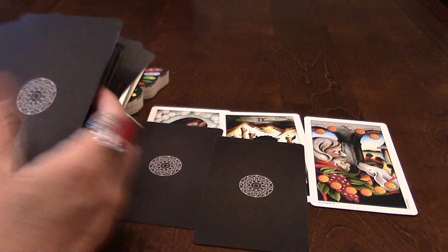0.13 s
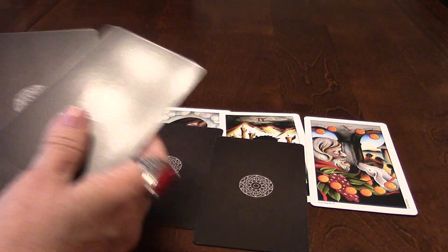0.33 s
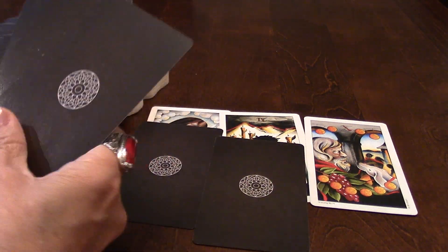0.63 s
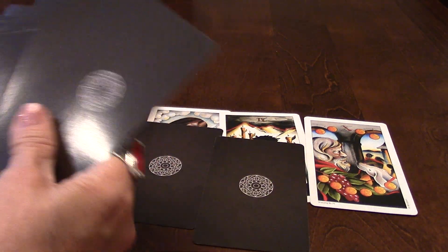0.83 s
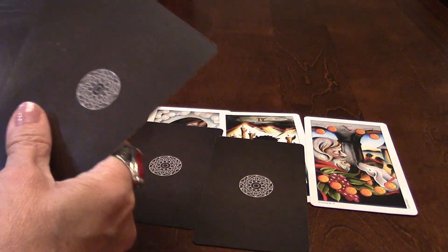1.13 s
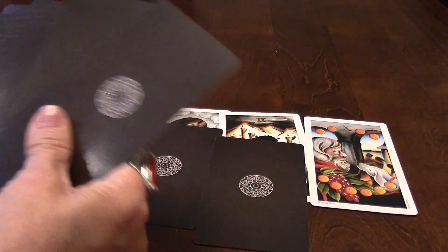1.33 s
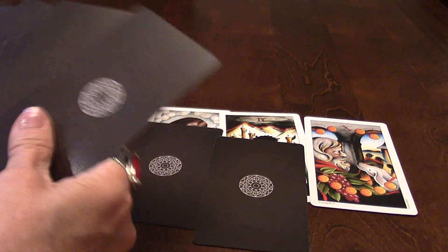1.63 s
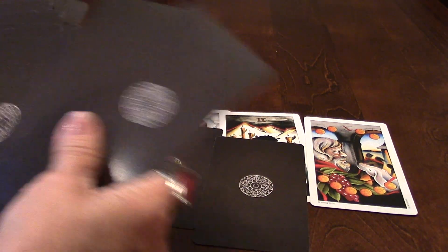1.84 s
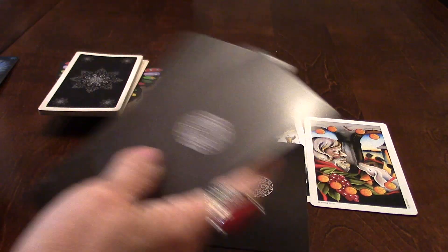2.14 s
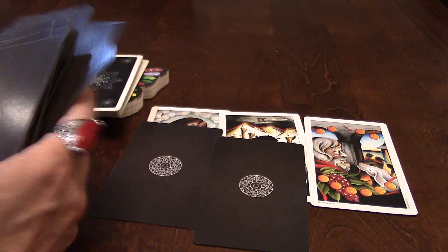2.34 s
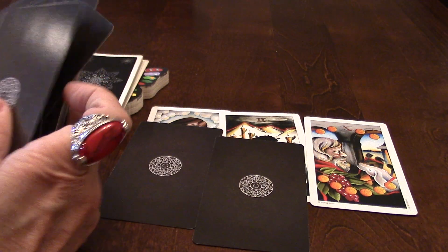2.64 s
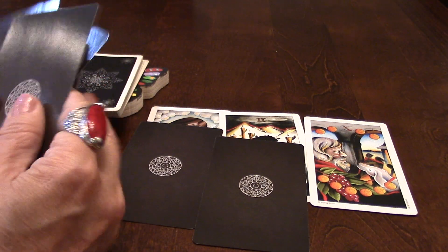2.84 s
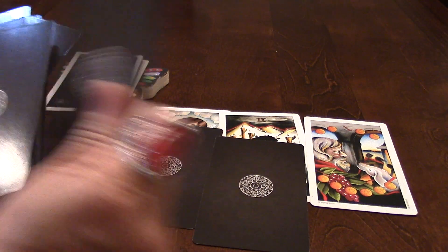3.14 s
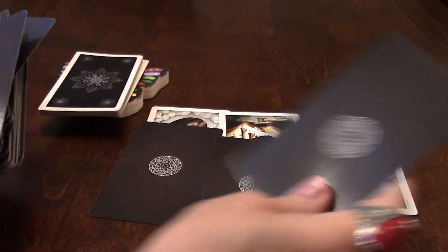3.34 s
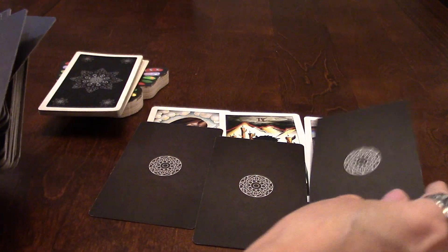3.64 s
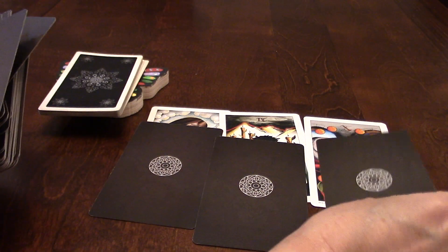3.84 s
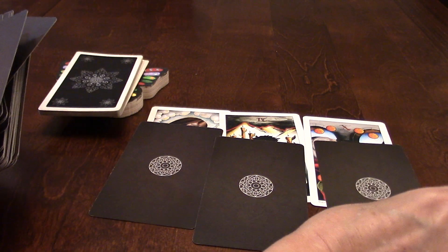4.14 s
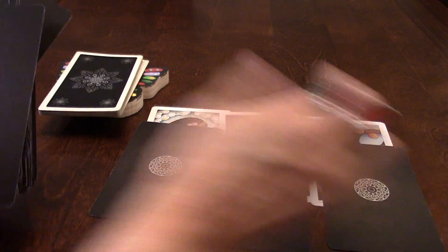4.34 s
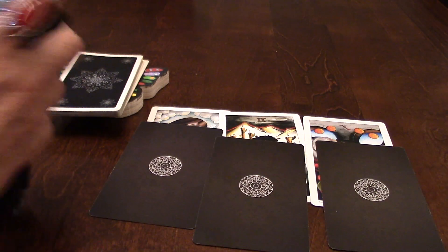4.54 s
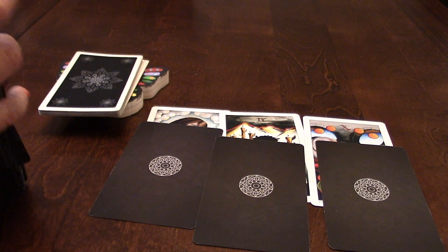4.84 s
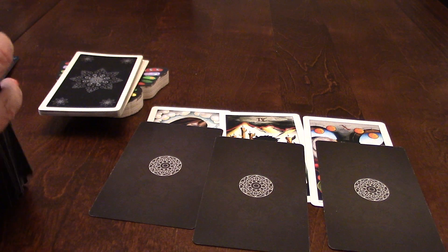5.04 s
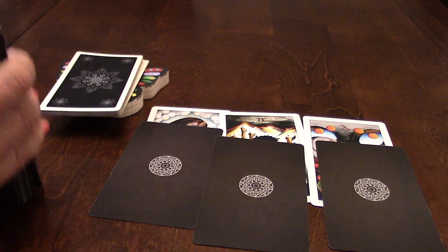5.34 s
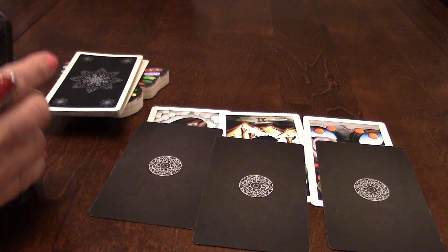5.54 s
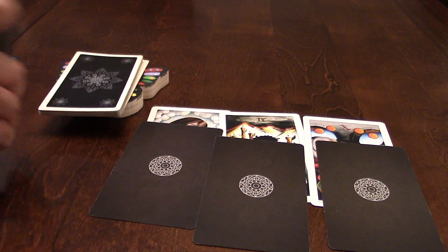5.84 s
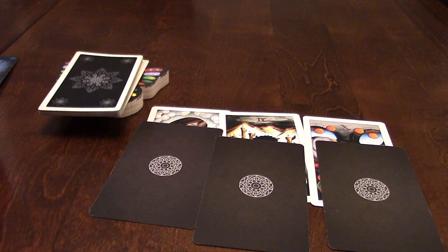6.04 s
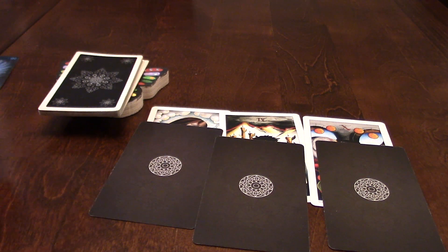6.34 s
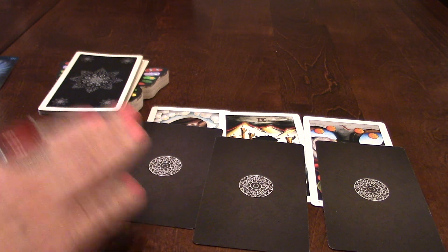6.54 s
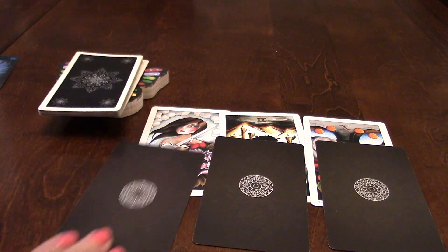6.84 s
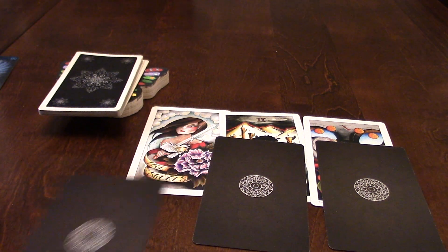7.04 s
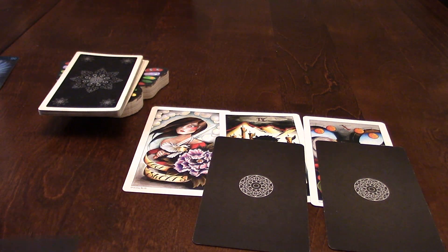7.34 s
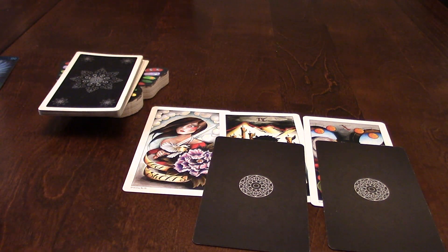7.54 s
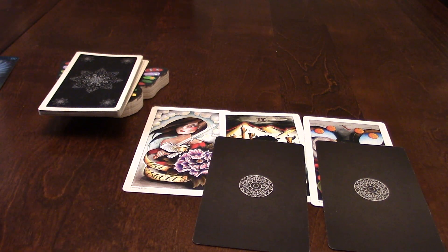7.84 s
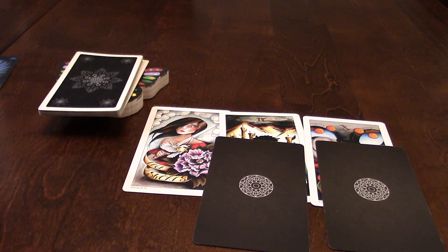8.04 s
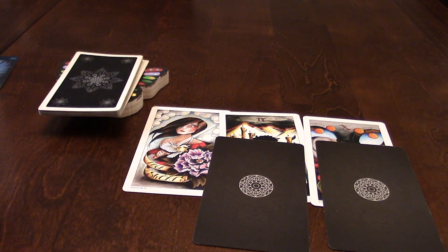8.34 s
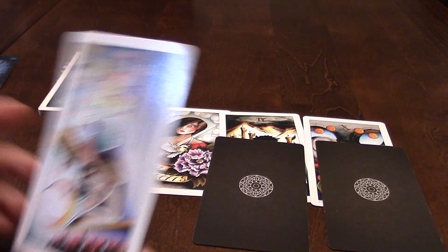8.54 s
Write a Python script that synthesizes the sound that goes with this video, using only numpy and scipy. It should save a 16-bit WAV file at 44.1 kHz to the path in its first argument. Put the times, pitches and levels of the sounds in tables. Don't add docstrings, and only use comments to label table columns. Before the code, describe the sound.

A small, bass-light camera microphone sits close to cards on a wooden table in a quiet room with a short, lively tail. A distant appliance hums faintly and unsteadily, while a tiny high focus-motor whine pulses about seven times a second at first, then in short bursts. From 0 to 1.9 s, stiff cards rub and flick softly with small snaps near 0.15 and 0.45. Sharp snaps cluster at 2.0 and 2.26-2.29, a lighter one at 2.6, then a swish and slap at 3.1-3.2. A very crisp slap lands at 4.1. The deck is knocked square at 4.6, 4.76 and 5.08, clacking woodily and shuffling as it settles. Light ticks and rubbing follow at 5.35-5.6. A heavy thump hits at 6.2, a softer one at 6.7. Thin airy sliding and faint ticks remain until 8.7, with two barely audible, very high motor tones between 7.1 and 8.

```python
import sys
import numpy as np
from scipy import signal
from scipy.io import wavfile
from scipy.ndimage import uniform_filter1d

SR = 44100
rng = np.random.default_rng(int(sys.argv[2]) if len(sys.argv) > 2 else 0)


def boost(x):
    u = np.asarray(x, float) / 20
    return 10 ** u


def unload_audio(sound):
    columns = np.transpose(np.atleast_2d(sound))
    steps = np.round(np.clip(columns, -1, 1) * 32767)
    wavfile.write(sys.argv[1], SR, steps.astype(np.int16))


N = 383229
TIME = np.arange(N) / SR


def rms_one(x):
    return x / np.sqrt(np.mean(x ** 2) + 1e-20)


def peak_one(x):
    return x / np.max(np.abs(x))


def band(x, low_hz, high_hz):
    sos = signal.butter(2, [low_hz, min(high_hz, .45 * SR)], "band", fs=SR, output="sos")
    return signal.sosfilt(sos, x)


def at_hz(points, hz, axis=1):
    table = np.array(points)
    return np.interp(np.log(hz), np.log(table[:, 0]), table[:, axis])


def drift(rate):
    r = np.exp(-80 * np.pi * rate / SR)
    noise = rng.standard_normal(N // 40 + 2002)
    slow = signal.lfilter([1], [1, -2 * r, r * r], noise)[2000:]
    return np.interp(np.arange(N) / 40, np.arange(len(slow)), rms_one(slow))


def resonate(x, peaks):
    out = 0
    for k, (hz, width_hz, level_db) in enumerate(peaks):
        r = np.exp(-np.pi * width_hz / SR)
        a = [1, -2 * r * np.cos(2 * np.pi * hz / SR), r * r]
        out = out + (-1) ** k * boost(level_db) * signal.lfilter([(1 - r * r) / 2, 0, (r * r - 1) / 2], a, x)
    return out


def ring(x, modes, longest_s):
    out = 0
    for hz, level_db, t60 in modes:
        r = boost(-60 / (min(t60, longest_s) * SR))
        w = 2 * np.pi * hz / SR
        out = out + boost(level_db) * signal.lfilter([0, np.sin(w)], [1, -2 * r * np.cos(w), r * r], x)
    return out


def contact(noise, ms):
    t = np.arange(len(noise)) / SR
    return noise * np.minimum(t / 0.0011, 1) * np.exp(-t / (max(ms, .3) / 2000))


def stick_slip_grains():
    slips = rng.random(N) < 12000 * boost(3.0 * drift(40)) / SR
    size = boost(1.1 * np.minimum(rng.exponential(1, N), 4))
    return slips * size * np.sign(rng.random(N) - .5)


def add(track, s, sound):
    i = round(s * SR)
    track[i:i + len(sound)] += sound[:N - i]


# (frequency [Hz], level [dB per Hz])
AIR = [(15, -57), (25, -15.5), (80, -19), (263, -5), (363, -5.5), (416, -4.5), (489, -10), (575, -6.5),
       (1190, -20.5), (4610, -30.5), (5730, -31), (7310, -39.5), (11300, -43.5), (14800, -49), (16000, -34)]
# (frequency [Hz], left-right likeness [0-1])
LIKENESS = [(60, 0.17), (180, 0.76), (550, 0.88), (1650, 0.5), (4970, 0.86), (15000, 0.58)]
AIR_DB = -49.5


def room_air():
    out = 0
    edges = 25 * 2 ** np.arange(0, 9.6, .5)
    white = rng.standard_normal((2, 2, N))
    for k, (low, high) in enumerate(zip(edges, edges[1:])):
        centre = np.sqrt(low * high)
        mid, side = band(white[k % 2], low, high)
        alike = np.clip(at_hz(LIKENESS, centre), 0, 1)
        gain = boost(at_hz(AIR, centre) + 0.89 * drift(2.6))
        out = out + gain * (np.sqrt(1 + alike) * mid + np.sqrt(1 - alike) * side * [[1], [-1]])
    return boost(AIR_DB - 1.0) * rms_one(out)


# (frequency [Hz], level [dB rms])
HUM = [(263.8, -63), (414.5, -53), (576.0, -64.5), (839.8, -72), (888.2, -91)]
WAVER_DB, WAVER_HZ = 1.2, 0.83


def appliance():
    out = boost(-58) * rms_one(resonate(rng.standard_normal(N), [(178.2, 23.4, 0)]))
    for hz, level_db in HUM:
        level = np.sqrt(2) * boost(level_db + WAVER_DB * drift(1.6))
        phase = 2 * np.pi * np.cumsum(hz + WAVER_HZ * drift(3.95)) / SR
        out += level * np.sin(phase)
    return out


# (time [s], level [dB peak])
MAINS = [(0, -63), (3.0, -68), (4.0, -73), (8.69, -72)]
MAINS_HZ = 59.7


def mains_pickup():
    return boost(np.interp(TIME, *np.transpose(MAINS))) * np.sin(2 * np.pi * MAINS_HZ * TIME)


# (time [s], pressure [dB], gliding speed as brightness [dB])
HANDLING = [(0, -61.5, -4), (1.1, -59, -8), (2.08, -60, -3), (2.4, -49, -8), (2.9, -62.5, -5),
            (3.45, -54, -6.5), (3.9, -63, -3.5), (4.48, -57, -9), (5.4, -54, -4), (5.7, -59, -6),
            (5.9, -75, -10), (6.2, -56, -1.5), (6.5, -63, -16.5), (6.75, -64, 7.5), (7.2, -59.5, 3),
            (7.6, -66, 0), (8.11, -58, -9), (8.69, -67, 0.5)]
# (frequency [Hz], width [Hz], level [dB])
CARD = [(1700, 1300, 4.5), (3140, 1270, 8.5), (3970, 1490, 5)]
# (frequency [Hz], width [Hz], level [dB])
EDGE = [(5370, 5050, 3.5), (10840, 4200, 0.5), (12800, 1170, -0.5)]
SCRAPE_DB, SCRAPE_FOLLOWS = -8.5, 0.22


def handling():
    s, pressure_db, bright_db = np.transpose(HANDLING)
    pressure_db, bright_db = np.interp(TIME, s, pressure_db), np.interp(TIME, s, bright_db)
    grains = stick_slip_grains()
    drag = rms_one(band(grains, 960, 1995))
    scrape = rms_one(band(resonate(grains, CARD), 2000, 11000))
    swish = rms_one(band(resonate(grains, EDGE), 5000, 16300))
    out = boost(pressure_db) * drag
    out += boost(pressure_db + SCRAPE_DB + SCRAPE_FOLLOWS * bright_db) * scrape
    return out + boost(pressure_db + bright_db) * swish


# (start [s], steps [count])
HUNTS = [(.013, 12), (2.55, 4), (3.48, 4), (4.435, 1), (5.09, 2), (5.482, 7), (6.485, 2), (6.962, 3),
         (7.43, 2), (7.75, 2), (8.08, 2), (8.425, 2)]
# (start [s], up to speed [s], stop [s], frequency [Hz], level [dB])
TRAVEL = [
    (7.115, 7.21, 7.57, 15396, -52),
    (7.555, 7.59, 7.99, 15628, -53.5),
]
STEP_S, FOCUS_ON_S = .1345, .066
FOCUS_HZ, FOCUS_DB, OVERTONE_DB = 5561, -68.0, -11.0
SPIN_UP_HZ_PER_S, CUT_S, COAST_S = 700, .015, .11


def focus_motor():
    steps = np.array([s + STEP_S * k for s, count in HUNTS for k in range(count)])
    since = TIME - steps[np.maximum(np.searchsorted(steps, TIME) - 1, 0)]
    gate = uniform_filter1d(((since > 0) & (since < FOCUS_ON_S)) * 1., size=200)
    w = 2 * np.pi * FOCUS_HZ * TIME
    out = gate * boost(FOCUS_DB) * (np.sin(w) + boost(OVERTONE_DB) * np.sin(2 * w))
    for start, full, stop, hz, level_db in TRAVEL:
        corners = [start, (start + full) / 2, full, stop, stop + CUT_S, stop + COAST_S]
        shape_db = np.interp(TIME, corners, [-23, -3, 0, 0, -20, -41], left=-200, right=-200)
        pitch = hz - SPIN_UP_HZ_PER_S * np.clip(full - TIME, 0, full - start)
        out += np.sqrt(2) * boost(level_db + shape_db) * np.sin(2 * np.pi * np.cumsum(pitch) / SR)
    return out


# (time [s], peak [dB], relative body [dB], relative edge [dB], contact [ms])
SNAPS = [(.132, -23.5, -12.5, -10.5, 8.5), (.178, -23.5, -12.5, -15, 2), (0.4466, -17.5, -24, -36, 8.2),
         (1.998, -11.5, -25, -10.5, 3.3), (2.259, -15, -14, -24, 12.4), (2.2751, -9.5, -22, -23.5, 10),
         (2.2854, -15.5, -19, -20, 4), (2.6205, -23, -17, -32, 1.4), (2.836, -33.5, -14.5, -32, 8.7),
         (3.1628, -13.5, -12, -15, 10.6), (3.167, -19, -7.5, -18, 1.7), (3.4506, -26, -33, -16, 2.8),
         (3.802, -21, -28, -53, 7.9), (4.0975, -7.5, -24, -2.5, 1.6), (4.1, -7, -13, -9, 1.1),
         (4.1296, -18, -20.5, -15, 8.6), (5.3528, -22, -13.5, -12.5, 5), (6.2152, -20, -3.5, -20, 5),
         (6.6822, -27, -14.5, -8.5, 6.2)]
# (time [s], peak [dB], relative body [dB],
# relative edge [dB])
TICKS = [(0.1394, -41, -19, -18), (0.553, -31.5, -16.5, -21), (.626, -47, -11, -11), (0.7396, -53, -10, -3),
         (2.4068, -45.5, -7, -6), (2.578, -37, -9.5, -17), (2.8612, -35, -16, -29), (3.2007, -51, -7, -18),
         (3.444, -42, -7, -12), (3.5223, -33, -10, -21), (3.5627, -46, -2, -29), (3.724, -50, -8, -20),
         (3.752, -35.5, -23, -28), (5.406, -29, -14, -25), (5.728, -47, -12, -10.5), (5.893, -44, -10, -11),
         (6.7344, -41, -16, -18), (8.158, -37, -25, -19)]
TICK_MS = 4.6
FREE_WALLS_DB, REBOUND_WALLS_DB = -2, -3.5
REBOUND_S = (.008, .06)
CUPPED_DB, CUPPED_S = -6, (1.9, 2.1)


def snaps():
    contacts = sorted([tuple(row) for row in SNAPS] + [(*row, TICK_MS) for row in TICKS])
    gaps = np.diff([0] + [row[0] for row in contacts])
    out = np.zeros((2, N))
    noise = rng.standard_normal((len(contacts), 2000))
    click = np.eye(1, 2000)[0] + 1e-18
    for (s, peak_db, body_db, edge_db, ms), gap, grit in zip(contacts, gaps, noise):
        wet_db = REBOUND_WALLS_DB if REBOUND_S[0] < gap < REBOUND_S[1] else FREE_WALLS_DB
        wet_db += CUPPED_DB * (CUPPED_S[0] < s < CUPPED_S[1])
        force = contact(grit, ms)
        layers = [(body_db + 16.5, band(force, 294, 1450), band(click, 336, 1250)),
                  (0, resonate(force, CARD), -band(click, 1100, 5000)),
                  (edge_db + 12, resonate(force, EDGE), band(click, 5000, 13000))]
        for level_db, rough, smooth in layers:
            sound = boost(peak_db - 4.5 + level_db) * peak_one(rough)
            add(out[0], s, sound)
            add(out[1], s, boost(wet_db) * rms_one(smooth) * np.std(sound))
    return out


# (frequency [Hz], t60 [s], level [dB])
ROOM = [(150, 0.51, -17.5), (500, 0.55, -18), (1320, 0.65, -25.5), (3670, 0.75, -20.5), (6000, 0.84, -33.5),
        (10000, 0.28, -21.5)]


def room(x):
    t, tail = np.arange(int(.7 * SR)) / SR, 0
    white = rng.standard_normal((2, 2, len(t)))
    for k, hz in enumerate(130 * 2. ** np.arange(7.5)):
        decay = boost(at_hz(ROOM, hz, axis=2) - 60 * t / at_hz(ROOM, hz))
        tail = tail + decay * band(white[k % 2], hz / np.sqrt(2), hz * np.sqrt(2))
    mid, side = tail * np.clip((t - .003) / 0.0032, 0, 1) * boost(-15)
    return np.array([signal.fftconvolve(x, mid + sign * 0.1 * side)[:N] for sign in (1, -1)])


# (start [s], length [s], level [dB], centre [Hz], width [octaves])
DRAWS = [(.27, 0.053, -53.5, 3340, 0.5), (.5, 0.089, -51, 2690, .76), (1.005, 0.055, -41.5, 1560, .9),
         (1.54, 0.086, -53.5, 9300, .84), (1.56, 0.083, -52.5, 2570, .93), (1.765, 0.105, -40, 3400, 1.6),
         (1.775, 0.09, -42, 8250, 0.73), (1.775, .09, -51, 12200, 0.63), (2.688, .015, -50, 2600, 0.25),
         (2.83, .015, -44.5, 2580, 0.26), (2.04, 0.089, -49.5, 3970, 0.69),
         (2.44, 0.051, -52.5, 5000, 0.74), (2.79, 0.065, -51.5, 6000, 2), (3.035, 0.16, -53, 8360, .6),
         (3.075, 0.097, -37.5, 4100, 2.45), (3.23, 0.19, -48, 8200, 0.83),
         (3.274, 0.014, -29.5, 1520, 0.41), (5.36, .125, -47, 8900, 0.8), (5.58, .155, -55, 9800, 1.1),
         (7.04, .104, -55, 10000, 1.2), (8.18, 0.062, -57.5, 6500, 0.36), (8.195, 0.044, -56, 2640, .7),
         (8.098, 0.058, -49.5, 4300, 1.6), (8.668, .028, -43.5, 2170, 2.4), (1.783, .028, -48, 3200, .3),
         (1.81, .042, -45, 3200, .5), (1.818, .035, -46, 8300, .3), (3.11, .05, -46, 3500, .4),
         (4.575, .075, -57, 9500, .9), (5.425, .05, -48, 8300, .3), (5.36, .115, -61, 13500, .4),
         (5.6, .13, -66, 13500, .4), (5.27, .08, -54, 8500, .9), (8.205, .04, -57, 3250, .2),
         (8.56, .09, -65, 3600, .1), (8.64, .012, -55, 3650, .15), (8.215, .014, -55, 2100, .5),
         (8.12, .03, -55, 7000, .3)]
# (start [s], length [s], level [dB], centre [Hz], width
FLICKS = [(.19, .12, -61, 8000, 1.1), (.39, 0.078, -51, 2960, 1.6), (.56, 0.1, -57, 9000, 1.01),
          (1.01, 0.12, -50.5, 5370, 2.1), (1.175, .07, -58.5, 6900, 1.7), (1.355, 0.054, -56, 9500, .8),
          (1.39, 0.1, -63.5, 10100, 0.71), (1.82, 0.16, -50, 5000, 1.7), (2.28, 0.094, -42.5, 7500, 1.3),
          (2.51, .09, -58, 11000, .61), (3.165, 0.043, -57, 1200, 1.7), (3.438, 0.021, -42.5, 5250, 0.49),
          (3.508, 0.057, -51.5, 6900, 1.01), (4.495, 0.18, -50.5, 4380, 1.8),
          (4.605, 0.047, -57, 9650, 0.9), (5.02, 0.069, -50.5, 8460, 1.1), (5.165, .16, -53.5, 8000, 1.3),
          (5.514, 0.04, -47, 8700, .66), (5.88, 0.12, -63.5, 9000, 1.1), (6.175, 0.08, -50.5, 11350, 0.51),
          (7.975, 0.13, -56, 2300, 1.3), (7.99, 0.13, -59.5, 6000, 0.42), (8.06, 0.014, -49, 1900, 0.4),
          (3.276, 0.011, -41.5, 6500, 2.1), (4.507, .06, -57, 12000, .8), (4.688, .085, -56, 7500, 1.0),
          (4.775, .09, -55, 8800, .8), (4.85, .17, -55, 8500, .85), (5.18, .15, -60, 13800, .3),
          (5.19, .14, -55, 9500, .5), (5.585, .1, -57, 6500, .6), (5.13, .1, -57, 7500, .7),
          (7.99, .12, -56, 2850, .22), (8.043, .04, -54, 1400, .3), (8.1, .025, -53, 1900, 1.4),
          (8.288, .018, -55, 2100, .3), (8.29, .12, -65, 3250, .2), (4.0978, .0022, -13, 5800, .45),
          (4.102, .035, -27, 1700, 2.0), (1.9988, .005, -23, 720, .6)]
DRAW_RISE, FLICK_RISE = 0.73, 0.21


def strokes():
    out, grains = np.zeros(N), stick_slip_grains()
    crackle = boost(2.1 * drift(120))
    for table, rise in [(DRAWS, DRAW_RISE), (FLICKS, FLICK_RISE)]:
        for k, (start, length, level_db, hz, octaves) in enumerate(table):
            own = round(start * SR + 5003 * k) % (N - SR)
            grit = grains[own:own + min(round(length * SR), N - round(start * SR))]
            swell = np.interp(np.arange(len(grit)) / SR, [0, rise * length, length], [0, 1, 0]) ** 0.79
            half = 2 ** (octaves / 2)
            rub = rms_one(band(grit, hz / half, hz * half))
            add(out, start, boost(level_db) * swell * crackle[own:own + len(grit)] * rub)
    return out


# (time [s], peak [dB], lowest [Hz], hardness [Hz], shudder [ms])
THUMPS = [(2.277, -39, 150, 690, 60.0), (3.168, -31, 112, 700, 50), (4.1031, -30.5, 166, 700, 52),
          (4.6194, -26, 169, 600, 76), (4.759, -25.5, 150, 700, 230), (5.081, -33, 178, 610, 107),
          (6.2168, -6, 119.5, 1590, 61), (6.686, -28.5, 100, 291, 160), (6.2258, -14, 150, 1500, 20),
          (3.166, -41, 45, 110, 20), (4.1, -47, 35, 110, 20)]
# (frequency [Hz], level [dB], t60 [s])
TABLE = [(123.7, -7.5, 0.31), (142, -20, .2), (180, -16, 0.3), (201.3, -20, 0.15), (225.4, 1.5, 0.21),
         (258, -10, .14), (275, 5, 0.05), (350.3, 1.5, 0.11), (460, 2, 0.11), (546, -10.5, 0.074),
         (697, -12.5, .12), (1000, -13, 0.07), (1305, -35, 0.11)]


def thumps():
    out, noise = np.zeros(N), rng.standard_normal((len(THUMPS), 20000))
    for (s, peak_db, low_hz, hard_hz, ms), grit in zip(THUMPS, noise):
        push = contact(1 + 0.17 * grit, ms=2.45)
        push = push + 0.23 * contact(grit, ms)
        soft = band(band(push, low_hz, hard_hz), low_hz * 1.31, 4400)
        thud = peak_one(ring(soft, TABLE, longest_s=.45)) + 0.5 * peak_one(soft)
        add(out, s, -boost(peak_db) * peak_one(thud))
    return out


# (time [s], peak [dB], lowest [Hz], hardness [Hz], contact [ms])
KNOCKS = [(4.7615,-15,2260,5500,14), (4.5973,-19,1200,2300,24), (4.607,-25,1220,4570,2.8),
          (4.616,-12.5,746,1900,12), (4.7496,-17.5,500,2600,42), (4.757,-4.5,910,4930,27.5),
          (4.9756,-29,690,2520,17), (5.072,-22,890,4200,8), (5.0805,-17,800,2600,14),
          (5.353,-35,500,1700,8.8), (5.37,-29,705,1620,8.2), (5.3894,-34,705,1500,5.5),
          (4.7635,-9,900,3800,9), (4.787,-18,900,4500,12), (3.172,-23,500,1300,14)]
# (frequency [Hz], level [dB], t60 [s])
DECK = [(600, -5, .08), (732, -4, .1), (1049, -1, .1), (1147, 3, .2), (1427, 1, .12), (1589, -2, .08),
        (1750, -6, .08), (1925, -8, .08), (2080, -12, .08), (2370, -2, .09), (2630, -6, .07),
        (2972, -16, .05), (3350, -7, .045), (4400, -9, .05)]
DECK_RING_DB, DECK_STRIKE_MS = -5.5, 2.5


def knocks():
    out, noise = np.zeros(N), rng.standard_normal((len(KNOCKS), 8000))
    click = np.eye(1, 8000)[0] + 1e-18
    for (s, peak_db, low_hz, hard_hz, ms), grit in zip(KNOCKS, noise):
        force = band(band(contact(grit, ms), low_hz, hard_hz), low_hz / 2, hard_hz * 0.62)
        add(out, s, boost(peak_db) * peak_one(force))
        blow = band(click, low_hz * .7, hard_hz * .9)
        clack = peak_one(ring(blow, DECK, longest_s=.25))
        add(out, s + DECK_STRIKE_MS / 1000, boost(peak_db + DECK_RING_DB) * clack)
    return out


SETTLE_DB, SETTLE_T60_S = -29, 1
SETTLE_SCRAPE_DB, HARD_HZ = -9, 5000
CHATTER_HZ = (1950, 5200)


def settling():
    kicks = np.zeros((2, N))
    for s, peak_db, low_hz, hard_hz, ms in KNOCKS:
        fine_share = boost(SETTLE_SCRAPE_DB) * (hard_hz / HARD_HZ) ** 2
        kicks[:, round((s + ms / 1000) * SR)] = boost(peak_db + SETTLE_DB) ** 2 * np.array([1, fine_share ** 2])
    loss = boost(-60 / (SETTLE_T60_S * SR)) ** 2
    coarse, fine = np.sqrt(signal.lfilter([1], [1, -loss], kicks + 1e-18))
    grains = stick_slip_grains()
    shuffle = rms_one(band(ring(grains, DECK, longest_s=0.03), 510, 2500))
    chatter = rms_one(band(band(grains, *CHATTER_HZ), *CHATTER_HZ))
    return coarse * shuffle + fine * chatter


def scene():
    direct, scattered = snaps()
    clacks, thuds = knocks(), thumps()
    rubbing = (handling() + strokes() + settling()) * boost(.9 * drift(30))
    cards = direct + clacks + thuds + rubbing
    spacing = 0.17 * np.gradient(cards) * [[1], [-1]]
    walls = room(scattered + boost(1) * clacks + boost(-5) * thuds)
    close = cards * boost(np.array([[.4], [-.4]])) + spacing
    background = (room_air() + appliance()) * boost(np.array([[.3], [-.3]]))
    return close + walls + background + focus_motor() + mains_pickup()


def top_cut(x):
    return signal.sosfilt(signal.butter(12, 16840, fs=SR, output="sos"), x)


def record(dry):
    thin = band(dry, 66, 16800)
    thin = signal.sosfilt(signal.butter(8, 16300, fs=SR, output="sos"), thin)
    return top_cut(np.clip(thin, -1, 1))


dry = scene()
out = record(dry)
unload_audio(out)
```